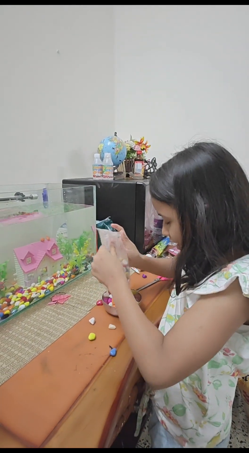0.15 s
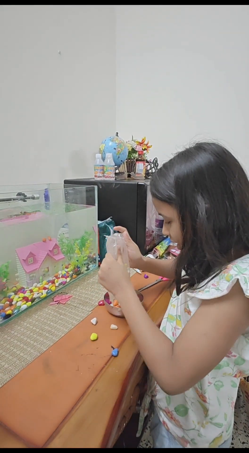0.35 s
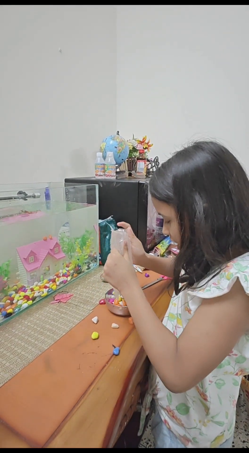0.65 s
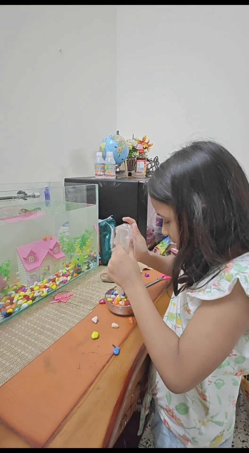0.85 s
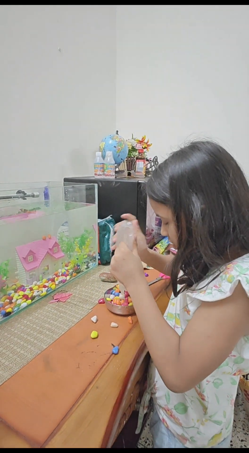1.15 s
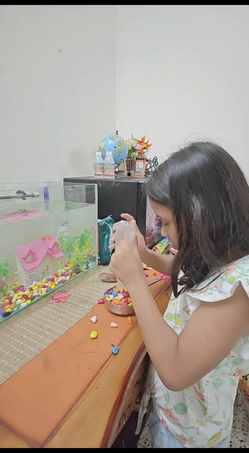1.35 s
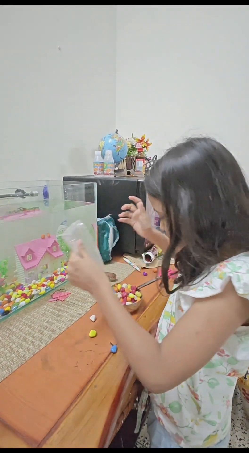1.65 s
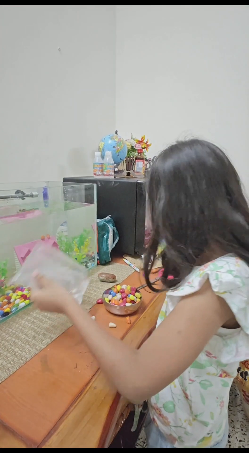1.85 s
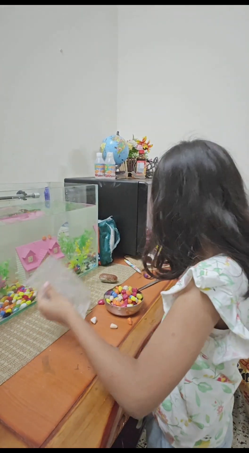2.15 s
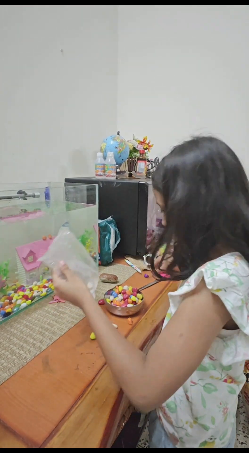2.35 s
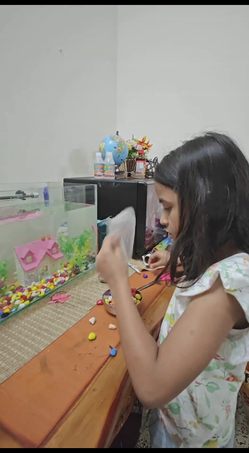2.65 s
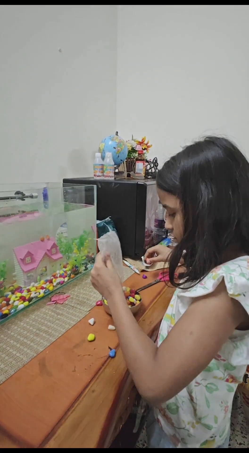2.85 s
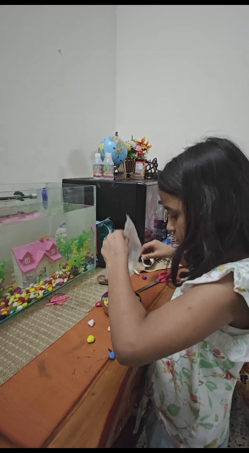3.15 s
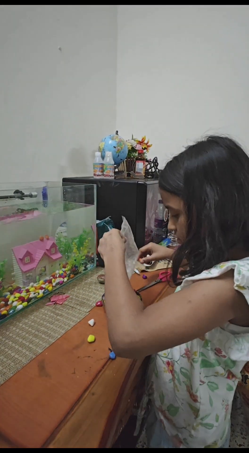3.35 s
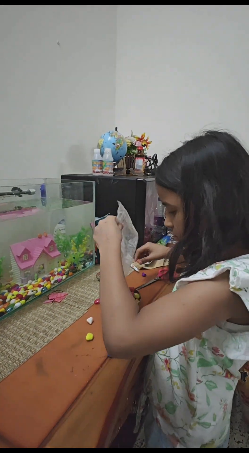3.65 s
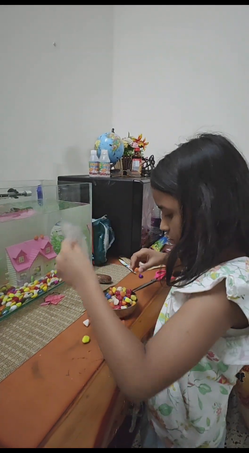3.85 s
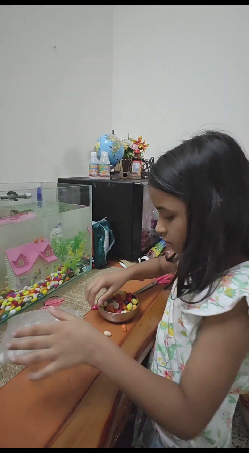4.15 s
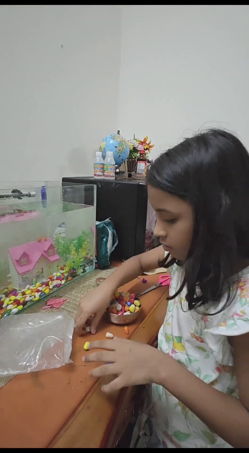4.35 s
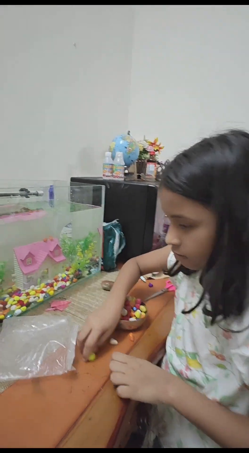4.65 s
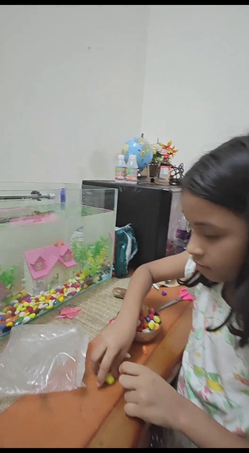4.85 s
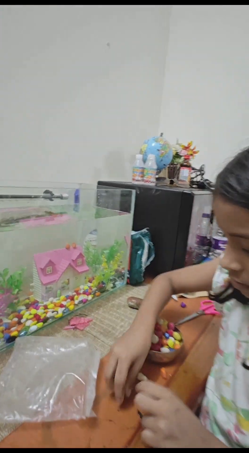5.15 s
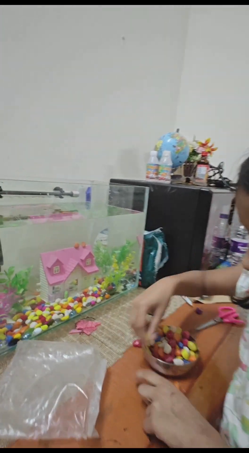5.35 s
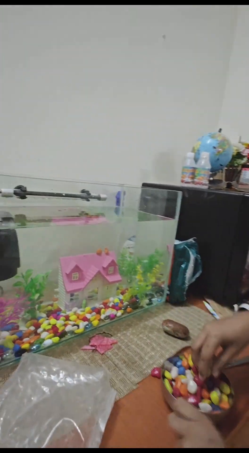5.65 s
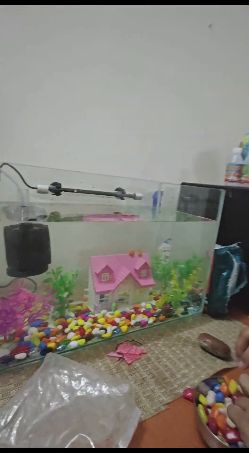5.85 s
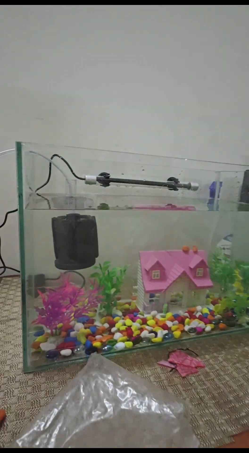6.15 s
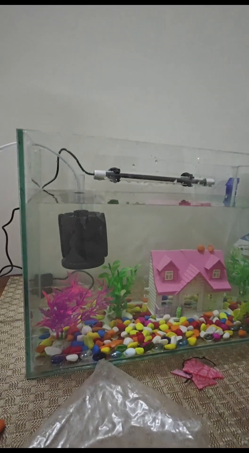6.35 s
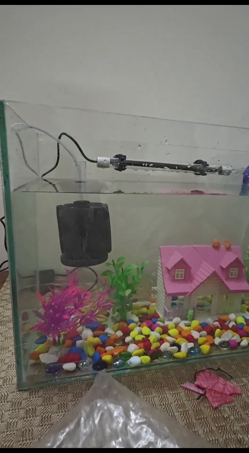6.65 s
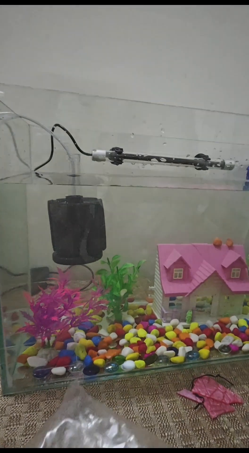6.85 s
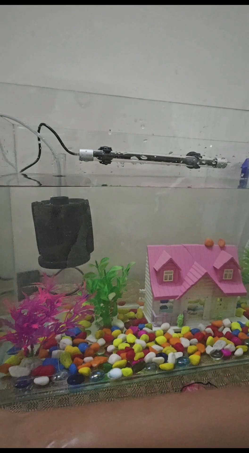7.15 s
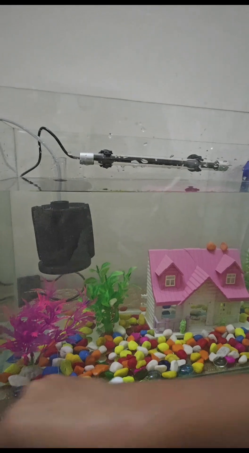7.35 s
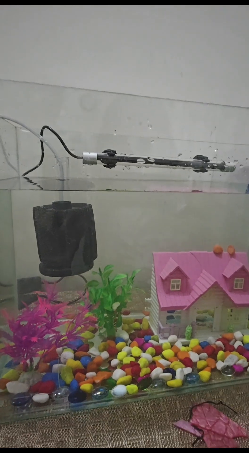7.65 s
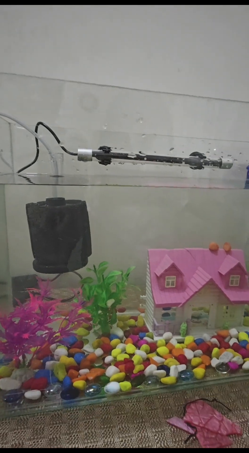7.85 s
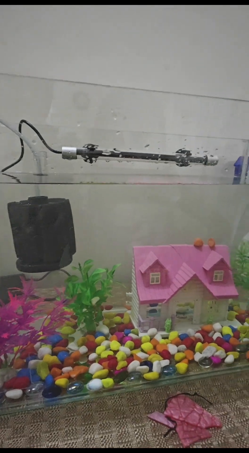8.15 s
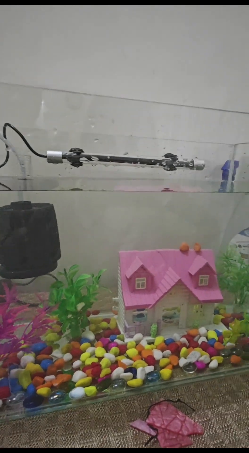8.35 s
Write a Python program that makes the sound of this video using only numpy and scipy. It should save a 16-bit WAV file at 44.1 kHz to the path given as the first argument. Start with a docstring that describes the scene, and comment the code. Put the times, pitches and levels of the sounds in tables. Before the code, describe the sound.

In a small, slightly echoing room, a close clatter of pebbles falls into a metal bowl, now and then making it ring. After about two seconds it thins to single clicks and brief bursts of rattling as the stones are shifted and dropped, knocking and rubbing on a wooden table. A quiet aquarium pump hums and hisses throughout, and something chirrs faintly far off a few times.

```python
"""Hard pebbles rattle out of a plastic bag into a steel bowl on a wooden table, close to the microphone;
then they are picked up, slid and dropped. Each knock cracks the stones and thumps the table, and a few
set the bowl's rim ringing. A hand or stone rubs over the wood. The small bare room answers, a tank pump
hums and hisses behind, and something chirrs far off. Heard through two microphone ports close together."""
import sys
import numpy as np
from scipy import signal
from scipy.io import wavfile
from scipy.ndimage import uniform_filter1d

SR = 44100
rng = np.random.default_rng(int(sys.argv[2]) if len(sys.argv) > 2 else 0)


def generate_wav(sig):
    """Save sig (samples, or channels by samples) to the path in sys.argv[1] as 16-bit PCM at SR."""
    pcm = np.round(np.clip(np.atleast_2d(sig).T, -1, 1) * 32767).astype(np.int16)
    wavfile.write(sys.argv[1], SR, pcm)


N = 374850


def amp(db):
    return 10 ** (np.asarray(db) / 20)


def unit_rms(x):
    return x / np.sqrt(np.mean(x ** 2) + 1e-20)


def curve_at(points, hz):
    """Interpolates (f/Hz, value) points over log frequency."""
    f, value = np.transpose(points)
    return np.interp(np.log(hz + 1), np.log(f + 1), value)


def stereo(a, b, likeness):
    """Left and right from two independent signals; likeness is their correlation, held to 0..1."""
    likeness = np.clip(likeness, 0, 1)
    return np.array([a, likeness * a + np.sqrt(1 - likeness ** 2) * b])


def ring(modes):
    """Impulse response of damped resonances, energy 1."""
    t = np.arange(2000) / SR
    h = sum((-1) ** k * amp(db) * np.sqrt(width) * np.exp(-np.pi * width * t) * np.sin(2 * np.pi * hz * t)
            for k, (hz, width, db) in enumerate(modes))
    return h / np.linalg.norm(h)


# resonances of pebble, table top, wood and ticking edges: f/Hz, width/Hz, relative level/dB
STONE = [(2006, 840, -3), (2665, 680, 3), (3056, 715, 3), (4228, 960, 1), (4800, 590, 0.5),
         (6420, 3200, 0.5)]
TABLE = [(170, 27, -16.5), (292, 37, -1.5), (355.7, 46, -1.5), (417, 74, -3)]
WOOD = [(578, 190, -3), (1002, 188, 1.5), (1180, 128, -0.5), (1463, 250, -4)]
TICK = [(7280, 3200, -1), (9770, 1300, 0), (11120, 810, -2.5), (14500, 1850, -16.5), (14940, 4100, -5.5),
        (15900, 1000, -5.5)]
BODIES = STONE, TABLE, WOOD, TICK
# band that each body radiates: low f/Hz, high f/Hz
BANDS = [(1500, 5600), (140, 700), (450, 2200), (5500, 17000)]


def body(modes, band):
    """A struck body rings within the band it can radiate."""
    return signal.sosfilt(signal.butter(3, band, "bandpass", fs=SR, output="sos"), ring(modes))


def body_levels(crack_db, weight_db, hard_db, thump_db, wood_db):
    """Level/dB of each body; strong, heavy, hard blows reach the table top most."""
    table_db = 1.18 * crack_db + 0.37 * weight_db + 0.38 * hard_db + thump_db
    return [crack_db, table_db, crack_db + weight_db + wood_db, crack_db + hard_db]


# contact with each body: rise/s, decay/s, left-right likeness, gain in knocks/dB
CONTACTS = [(0.000077, 0.0022, 0.49, 0.5), (0.00073, 0.004, 0.96, -5.5), (0.00046, 0.0014, 0.65, -1),
            (0.0005, 0.0019, 0.07, 4)]


def contact_force(rise, decay):
    """The force of one contact builds quickly and dies away."""
    t = np.arange(600) / SR
    return (1 - np.exp(-t / rise)) ** 2 * np.exp(-t / decay)


# stream of stones from the bag: t/s, level/dB, weight/dB, hardness/dB
POUR = [(0, -33, -10.5, -10), (.27, -41, -10, -13), (.46, -26.5, -12, -1.5), (.8, -30, -9, -1.5),
        (1.15, -26, -16.5, -4), (1.165, -16, -10.5, -18.5), (1.36, -37.5, -11, -8), (1.7, -34.5, -9, -14.5),
        (1.86, -57, -1, -4), (2.0, -43.5, -2.5, -24), (2.1, -62, -17, -20)]
# handfuls shifted afterwards: start t/s, loudest t/s, end t/s, level/dB, weight/dB, hardness/dB
SLIDES = [(2.703, 2.78, 2.85, -36, -27, -11.5), (4.599, 4.75, 4.92, -48.5, 4, -35),
          (5.427, 5.507, 5.6, -41.5, -36, -5), (6.243, 6.276, 6.55, -46, -9.5, -10.5),
          (6.9, 7.08, 7.26, -35.5, -11, -3), (7.854, 8.07, 8.5, -46, -4.5, -12)]


def pour_and_slides():
    """Level, weight and hardness of the loose stones: the pour runs out, each slide swells and fades."""
    t = np.arange(N) / SR
    times, *columns = np.transpose(POUR)
    out = np.array([np.interp(t, times, column) for column in columns])
    out[0, t > times[-1]] = -np.inf
    for start, loudest, end, db, weight_db, hard_db in SLIDES:
        on = (t >= start) & (t < end)
        out[0, on] = db + np.interp(t[on], [start, loudest, end], [-13.5, 0, -18.5])
        out[1:, on] = [[weight_db], [hard_db]]
    return out


def rattle(contacts_per_s=650):
    """Close by, loose stones touch at random moments: many small contacts, a few large."""
    touching = rng.random(N) < contacts_per_s / SR
    sizes = amp(2.9 * np.minimum(rng.exponential(1, N), 3)) * touching
    db, weight_db, hard_db = pour_and_slides()
    gains = amp(body_levels(db, weight_db, hard_db, thump_db=-1.5, wood_db=1.5))
    tilt_db = 5 + 0.46 * hard_db  # small stones lift the upper rings, large ones the lower
    noise = rng.standard_normal((2, N))
    out = np.zeros((2, N))
    for gain, modes, band, (rise, decay, likeness, _) in zip(gains, BODIES, BANDS, CONTACTS):
        uneven = amp(3.5 * np.clip(rng.standard_normal(N), -2, 2))  # no contact stirs all bodies alike
        force = signal.oaconvolve(sizes * uneven, contact_force(rise, decay))[:N]
        scrape = gain * unit_rms(force * stereo(*noise, likeness))
        groups = [(modes, 1)]
        if modes is STONE:
            groups = [(modes[:3], amp(-tilt_db) / np.sqrt(2)), (modes[3:], amp(tilt_db) / np.sqrt(2))]
        for group, share in groups:
            out += signal.oaconvolve(scrape * share, body(group, band)[None])[:, :N]
    return amp(-5) * out


# wash of pump and air at the microphone: f/Hz, relative density/dB
WASH_SPECTRUM = [(12, -31.5), (20, -6), (108, -14.5), (135, -14), (281, -6), (393, -15.5), (583, -11.5),
                 (1790, -24), (2010, -21), (2970, -18.5), (3520, -29.5), (4050, -23), (7100, -41),
                 (15200, -46.5), (16500, -61)]
# its stereo image: f/Hz, left-right likeness
WASH_LIKENESS = [(60, 0.97), (240, 0.88), (950, 0.18), (3770, -1.3), (15000, 0.02)]
# narrow bands of the pump: f/Hz, width/Hz, level/dB, left-right likeness
PUMP_BANDS = [(86.6, 11, -68, 0.83), (103.8, 13, -67.5, 0.89), (2080, 120, -60.5, 0.12),
              (6360, 630, -75, 0.44), (10820, 1300, -80, 0.17)]


def tank_pump(wash_db=-55.5):
    """In the background, a steady wash with soft patches and the pump's fuzzy bands."""
    frames, hz = N // 256 + 5, np.fft.rfftfreq(1024, 1 / SR)
    a, b, c, d, patches = rng.standard_normal((frames, 513, 5)).T
    patches = unit_rms(uniform_filter1d(uniform_filter1d(patches, size=10, axis=0), size=14, axis=1))
    spectrum = stereo(a + 1j * b, c + 1j * d, curve_at(WASH_LIKENESS, hz)[:, None])
    spectrum *= amp(3.5 * patches + curve_at(WASH_SPECTRUM, hz)[:, None])
    out = amp(wash_db) * unit_rms(signal.istft(spectrum, nperseg=1024, noverlap=768)[1][:, :N])
    for f, width, db, likeness in PUMP_BANDS:
        h = ring([(f, width, 0)])
        noise = stereo(*rng.standard_normal((2, N)), likeness)
        band = signal.oaconvolve(noise, np.convolve(h, h)[None])[:, :N]
        waver_db = 2 * unit_rms(uniform_filter1d(rng.standard_normal(N), size=9000))  # it runs unevenly
        out += amp(db + waver_db) * unit_rms(band)
    return out


# decay of the small bare room: f/Hz, t60/s
ROOM_DECAY = [(200, 0.37), (530, 0.47), (1390, 0.45), (3680, 0.41), (9700, 0.27), (15000, 0.2)]
# stereo image of its tail: f/Hz, left-right likeness
ROOM_LIKENESS = [(100, 1), (400, 0.94), (900, 0.292), (2500, 0.174)]


def room(sound, tails=3, gap_s=0.005, swell_s=0.0036, level_db=-1.5):
    """Sparse wall echoes, each band dying at its own speed; the tails take turns as hands move about."""
    out, start = np.zeros((2, N)), round(gap_s * SR)
    turn = 2 * np.pi * 3.1 * np.arange(N) / SR
    grid = np.arange(start, SR // 2 - 16, 16)
    for k in range(tails):
        arrivals = grid + rng.integers(0, 16, (2, SR))[:, :len(grid)]
        signs = rng.choice([-1., 1.], (2, SR))[:, :len(grid)]
        echoes = np.zeros((2, SR // 2))
        np.put_along_axis(echoes, arrivals, signs, axis=1)
        hz, t, spectrum = signal.stft(echoes, SR, nperseg=256)
        spectrum = stereo(*spectrum, curve_at(ROOM_LIKENESS, hz)[:, None])
        spectrum *= amp(-60 * t / curve_at(ROOM_DECAY, hz)[:, None])
        tail = signal.istft(spectrum, SR, nperseg=256)[1]
        tail[:, :start] = 0
        age = np.arange(tail.shape[1]) / SR
        tail *= 1 - np.exp(-age / swell_s)  # the far walls answer late
        clumps = unit_rms(uniform_filter1d(rng.standard_normal(len(age)), size=90))
        tail *= amp(5.4 * clumps * np.exp(-age / 0.045))  # early echoes come in clumps
        share = np.sqrt(2 / tails) * np.cos(turn + np.pi * k / tails)
        out += signal.oaconvolve(sound * share, tail / np.linalg.norm(tail[0]), axes=1)[:, :N]
    return amp(level_db) * out


# single knocks: t/s, crack level/dB, weight/dB (lifts the low bodies), hardness/dB (the tick), pebble f/Hz
KNOCKS = [(0.0382, -11.5, -18.5, -11, 3940), (0.0915, -25, -19.5, -32, 3200),
          (0.2222, -18.5, -23, -12, 3020), (0.283, -12.5, -14, -9.5, 3280), (0.295, -7, -20.5, -8, 4060),
          (0.3172, -10, -15.5, -7.5, 4370), (0.3648, -12.5, -25.5, -11, 3230), (0.3886, -17, -21, -8, 4450),
          (0.4109, -8, -21.5, -20.5, 3270), (0.4389, -13.5, -22, -16, 2880), (0.4843, -6, -23, -16.5, 3860),
          (0.5607, -11, -23.5, -12.5, 4470), (0.5714, -8, -22, -22, 4250), (0.5954, -9.5, -18, -10.5, 4150),
          (0.6125, -6, -16.5, -16, 3330), (0.7075, -9, -20.5, -19, 2730), (0.7613, -12.5, -15.5, -11, 2720),
          (0.8653, -6.5, -21, -16, 2900), (0.9379, -16.5, -16, -13, 4070), (0.9909, -19.5, -25, -22, 4450),
          (1.0097, -7, -25, -18, 3980), (1.0285, -8, -18.5, -15, 4720), (1.0485, -9, -23, -23, 4800),
          (1.0634, -8.5, -21.5, -16, 4030), (1.163, -3, -12, -31, 2720), (1.2542, -6, -11.5, -21, 2200),
          (1.2951, -12, -9, -17, 3800), (1.3646, -9.5, -5, -12, 3200), (1.4298, -3.5, -12, -18.5, 3970),
          (1.4501, -3.5, -15.5, -30.5, 3140), (1.499, -9, -9.5, -30, 3710), (1.5175, -7.5, -13, -21, 2970),
          (1.6372, -5.5, -16, -9, 2790), (1.7464, -24, -18, -19, 2710), (1.8099, -14.5, -20.5, -12.5, 3240),
          (1.854, -19, -19, -19, 2680), (1.8826, -22, -28, -33, 2740), (1.9165, -19, -18, -32, 3140),
          (2.0075, -23, -13, -23, 4230), (2.0687, -37.5, 2, -29, 2200), (2.1937, -26.5, -13, -28, 3170),
          (2.2204, -22.5, -18, -27, 4630), (2.2556, -30.5, -10.5, -28, 3170),
          (2.283, -25.5, -17.5, -28, 4160), (2.4001, -23, -13, -30, 3650), (2.4763, -42, 6, -29, 2000),
          (2.7292, -26, -16, -28, 3180), (2.7446, -21.5, -11, -28, 2490), (2.7697, -22.5, -19, -20, 3120),
          (2.8214, -22.5, -16, -22, 4060), (2.8412, -23.5, -17.5, -30, 3060), (2.9245, -28, -22, -36, 2900),
          (3.2017, -23.5, -25.5, -18.5, 3790), (3.256, -36.5, -3.5, -11, 2990),
          (3.2842, -20, -12, -26, 2840), (3.2895, -14, -21.5, -16.5, 4100),
          (3.4689, -6.5, -15.5, -16, 4570), (3.4805, -22, -16, -8, 4300), (3.4883, -14.5, -28, -12, 2320),
          (3.709, -38, -22, -32, 3300), (4.063, -15.5, -19, -26, 2860), (4.0689, -17, -8, -4, 2240),
          (4.0913, -17, -22, -19, 2920), (4.2303, -12.5, -20, -12.5, 3380), (4.3113, -28, -9.5, -9, 3100),
          (4.365, -22.5, -12.5, -12, 4090), (4.6525, -36, -2.5, -10, 2800), (4.685, -47, 1, -26, 3160),
          (4.7502, -18, -10, -44, 3000), (4.9666, -27.5, -4.5, -43, 2790), (5.0271, -36.5, -3, -33, 3060),
          (5.0431, -27, -10.5, -28, 1980), (5.5987, -38, -5.5, -27.5, 2930), (5.6305, -40, -2, -29, 3120),
          (5.7552, -15.5, -10, -7, 3100), (5.7668, -12, -15.5, -8.5, 3100),
          (5.775, -23.5, -18.5, -27, 4150), (5.859, -12.5, -17.5, -7, 2800),
          (5.8778, -20.5, -22.5, -25, 4040), (5.9645, -11.5, -6.5, 1.5, 3230),
          (5.9758, -12.5, -17, -6, 3990), (5.9983, -10, -23, -6.5, 3070), (6.3185, -18.5, -26, -30, 3010),
          (6.3988, -35.5, -4, -13, 3200), (6.4624, -45.5, 6, -29, 2160), (6.5716, -15.5, -20, -20.5, 3200),
          (6.7967, -13, -14.5, -2.5, 3750), (6.8117, -8, -15.5, -7.5, 2770), (6.8284, -18, -14, -15, 2900),
          (6.8477, -9.5, -21, -12, 3050), (6.867, -8, -19, -10, 2940), (6.8912, -18, -27, -24, 2570),
          (6.9326, -15, -16, -26, 2960), (6.9688, -15.5, -20.5, -19, 3600), (6.9924, -15.5, -18, -15, 2970),
          (7.0157, -19.5, -15, -30, 3000), (7.0978, -24, -11.5, -21, 2820), (7.1749, -24, -13, -24, 2830),
          (7.1903, -16.5, -17, -20, 2830), (7.225, -12, -12.5, -23.5, 3280), (7.2908, -27.5, -6, -25, 3200),
          (7.3644, -49, 1, -36, 3290), (7.4124, -35.5, -6.5, -32, 2300), (7.7325, -8.5, -16.5, -4.5, 4200),
          (7.7431, -11.5, -23, -22, 3860), (7.9356, -19.5, -28, -21, 4360), (7.9775, -32, -15, -32, 4110),
          (8.1134, -21.5, -14, -2.5, 4180), (8.1329, -18.5, -16, -12.5, 3150),
          (8.2194, -32, -14, -18, 3230), (8.4065, -18.5, -35, -16.5, 3830)]
# their room share, lower when the microphone comes close or a hand shields the stones: t/s, level/dB
ROOM_SHARE = [(0, -4.5), (.3, 2.5), (1.2, -2), (1.7, 0.5), (2.2, -3.5), (2.9, -1.5), (4.3, 2), (5, 3),
              (5.8, -2), (6.35, -4), (6.57, -9), (6.85, -1.5), (7.1, 5), (7.25, -12.5), (7.75, -3),
              (7.95, -7.5), (8.4, -5.5)]
# the thump grows as the microphone moves in over the table top: t/s, level/dB
TABLE_PROXIMITY = [(4.0, 2), (5.0, -2), (5.7, 4.5), (6.9, 4), (7.7, 2.5)]


def knocks():
    """A brief rough scrape sets all four bodies ringing; returns direct sound and the room's share."""
    times, crack_db, weight_db, hard_db, pebble_hz = np.transpose(KNOCKS)
    thump_db = -6.5 + np.interp(times, *np.transpose(TABLE_PROXIMITY))
    levels = body_levels(crack_db, weight_db, hard_db, thump_db, wood_db=5.5)
    a, b = rng.standard_normal((len(times), 2, 600)).swapaxes(0, 1)
    a[:, 14:16] += [6.0, -6.0]  # the first hard edge of the blow
    blows = 0
    for db, modes, band, (rise, decay, likeness, gain_db) in zip(levels, BODIES, BANDS, CONTACTS):
        voicings = [modes]
        if modes is STONE:  # every pebble favours the rings near a pitch of its own
            voicings = [[(f, width, mode_db - 7.4 * np.log2(f / own) ** 2) for f, width, mode_db in modes]
                        for own in pebble_hz]
        responses = np.array([body(voicing, band) for voicing in voicings])
        scrape = stereo(a, b, likeness) * contact_force(rise, decay)
        rung = signal.fftconvolve(scrape, responses[None], axes=2)
        blows = blows + rung / abs(rung).max(axis=2, keepdims=True) * amp(db + gain_db)[:, None]
    room_gain = amp(np.interp(times, *np.transpose(ROOM_SHARE)))
    length = blows.shape[2]
    direct, to_room = np.zeros((2, 2, N + length))
    for k, at in enumerate(np.round(times * SR).astype(int)):
        direct[:, at:at + length] += blows[:, k]
        to_room[:, at:at + length] += room_gain[k] * blows[:, k]
    return direct[:, :N], to_room[:, :N]


# modes of the steel rim: f/Hz
RIM_HZ = [3135, 6372, 7637, 8986, 10436, 11970, 13604, 15290]
# the same modes: level/dB, t60/s
RIM_MODES = [(-21, 0.16), (-4, 0.42), (-2.5, 0.3), (-8, 0.36), (-3, 0.19), (-4, 0.243), (-4.5, .24),
             (1.5, 0.25)]
# stones that catch the rim: t/s, level/dB, most stirred f/Hz, share of the ring time left by the load
RIM_BLOWS = [(.412, -29.5, 8000, 0.91), (0.615, -29.5, 12300, 1), (.70, -34.5, 9000, 1),
             (0.868, -27, 11400, 1), (0.958, -29.5, 11500, 0.49), (1.065, -36, 12500, 0.94),
             (1.48, -34.5, 7740, 0.52), (4.232, -30.5, 9720, 0.76)]


def steel_bowl():
    """Thin steel rings on in close pairs that beat; each blow stirs the modes differently."""
    out, t = np.zeros((2, N)), np.arange(SR // 4) / SR
    hz = np.array(RIM_HZ)[:, None]
    mode_db, t60 = np.transpose(RIM_MODES)[:, :, None]
    draws = rng.random((len(RIM_BLOWS), 3, 2, len(RIM_MODES), 1))
    for (start, db, stirred_hz, ring_share), (phase, beat_phase, luck) in zip(RIM_BLOWS, draws):
        beating = 1 + 0.8 * np.cos(2 * np.pi * (0.0017 * hz * t + beat_phase))
        struck_db = db + mode_db + 3.8 * luck - 14 * np.log2(hz / stirred_hz) ** 2
        envelope = amp(struck_db - 60 * t / (t60 * ring_share)) * np.minimum(t / 0.0022, 1)
        tones = envelope * beating * np.sin(2 * np.pi * (hz * t + phase))
        out[:, round(start * SR):][:, :len(t)] += tones.sum(axis=1)
    return out


def swells(rows, width, likeness, throb=0, throb_hz=30):
    """Bands of noise that rise and fall; width is a share of the pitch, throb a depth."""
    out, t = np.zeros((2, N)), np.arange(N) / SR
    noise = stereo(*rng.standard_normal((2, N)), likeness)
    noise *= 1 + throb * np.sin(2 * np.pi * throb_hz * t)
    for middle, length, db, hz in rows:
        on = slice(round((middle - length) * SR), round((middle + length) * SR))
        h = ring([(hz, width * hz, 0)])
        band = signal.oaconvolve(noise[:, on], np.convolve(h, h)[None], axes=1)[:, :len(t[on])]
        out[:, on] += amp(db) * unit_rms(band) * np.exp(-(2 * (t[on] - middle) / length) ** 2)
    return out


# drags on the table top: middle t/s, length/s, level/dB, f/Hz
RUBS = [(2.18, 0.091, -58, 103), (2.46, 0.071, -49, 990), (4.68, 0.055, -44.5, 1080),
        (4.745, 0.036, -37, 1220), (5.03, 0.0091, -34, 1200), (5.55, 0.03, -50.5, 1040),
        (6.45, 0.071, -51, 337), (7.2, 0.035, -36, 1130), (8.04, .11, -44, 355), (8.32, .051, -50, 398)]


def rubs():
    """Near the microphone, a hand or stone drags over the wood with a short swell of friction noise."""
    return swells(RUBS, width=0.3, likeness=0.8)


# faint chirrs: middle t/s, length/s, level/dB
CHIRRS = [(2.56, 0.18, -55), (3.14, 0.16, -58.5), (3.846, 0.28, -59.5), (4.55, 0.55, -62),
          (7.446, 0.23, -58.5)]


def far_chirrs(hz=3400):
    """Far off, a narrow band of noise swells with a quick throb."""
    return swells([(*row, hz) for row in CHIRRS], width=0.06, likeness=0.1, throb=0.18)


def scene():
    """The table in front, the room around it, pump and chirrs behind."""
    direct_knocks, knocks_to_room = knocks()
    on_table = rattle() + steel_bowl() + rubs()
    return direct_knocks + on_table + room(knocks_to_room + on_table) + tank_pump() + far_chirrs()


# colour of the two microphone ports: f/Hz, left minus right level/dB
PORT_BALANCE = [(60, -2.5), (110, -6.5), (200, 1.5), (380, -1.5), (700, -2.5), (1290, 0.5), (2380, -5),
                (4400, -8.5), (8120, 2.5), (15000, -0.5)]


def record(dry, cutoff_hz=16250):
    """The two ports colour the sound differently; the preamp and a band limit follow."""
    hz = np.linspace(0, SR / 2, 257)
    balance_db = curve_at(PORT_BALANCE, hz)
    ports = np.array([signal.firwin2(255, hz, amp(side * balance_db / 2), fs=SR) for side in (1, -1)])
    ports[0] = np.roll(ports[0], 2)  # the right port is nearer by two samples
    coloured = signal.oaconvolve(dry, ports, "same", axes=1)
    rounded = 1.2 * np.tanh(coloured / 1.2)  # the preamp rounds the tallest peaks
    lowpass = signal.firwin(127, cutoff_hz, window=("kaiser", 12), fs=SR)
    return signal.oaconvolve(rounded, lowpass[None], "same", axes=1)


dry = scene()
out = record(dry)
generate_wav(out)
```